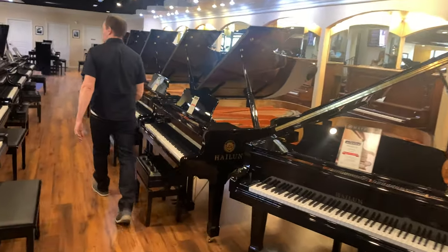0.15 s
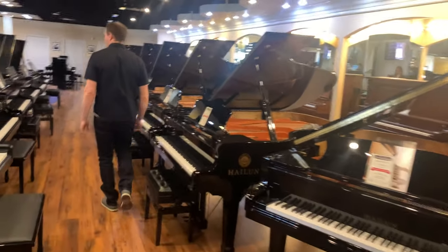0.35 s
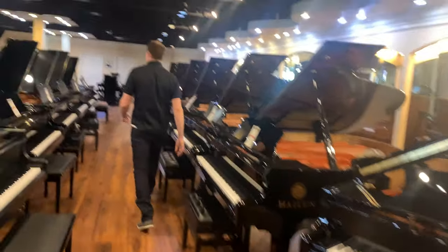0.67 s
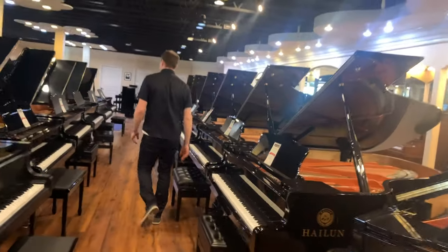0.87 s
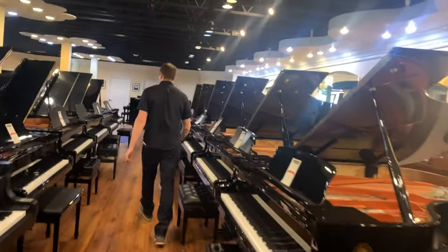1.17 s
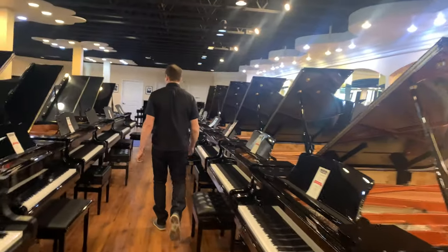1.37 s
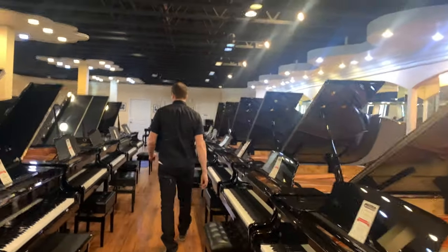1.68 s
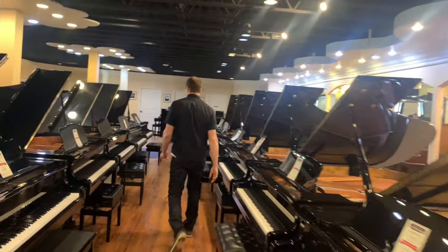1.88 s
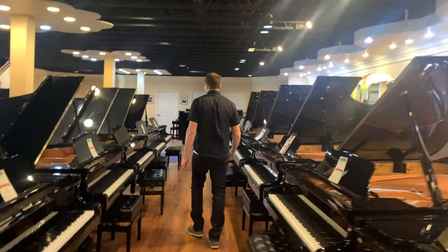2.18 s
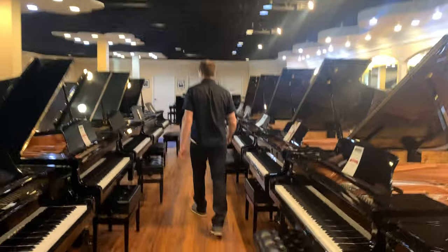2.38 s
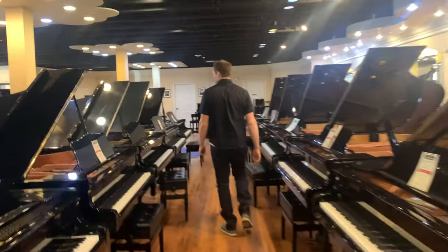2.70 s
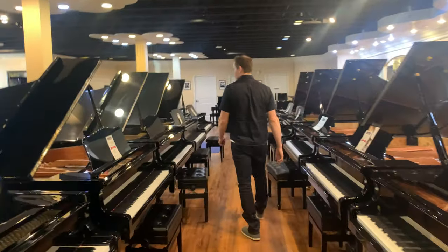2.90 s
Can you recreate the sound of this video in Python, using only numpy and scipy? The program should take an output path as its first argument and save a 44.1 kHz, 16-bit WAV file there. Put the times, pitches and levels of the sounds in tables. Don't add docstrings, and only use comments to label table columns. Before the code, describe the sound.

Footsteps on wooden boards, hollow heel knocks at a walking pace, echoing over faint ventilation hum

```python
import sys
import numpy as np
from scipy import signal
from scipy.fft import rfft, irfft
from scipy.io import wavfile
from scipy.ndimage import uniform_filter1d

SR = 44100
rng = np.random.default_rng(int(sys.argv[2]) if len(sys.argv) > 2 else 0)


def to_linear_factor(level_db):
    exponent = np.asarray(level_db, float) / 20
    return 10 ** exponent


def generate_wav(sig):
    pcm = np.round(np.clip(np.atleast_2d(sig).T, -1, 1) * 32767).astype(np.int16)
    wavfile.write(sys.argv[1], SR, pcm)


N = 134505
SIZE = 32768

# start_s, level_db, board_pitch_hz, board_width_hz, tick_re_knock_db
HEEL_KNOCKS = [(0.1178, -37.5, 390, 231, -40), (0.645, -47, 400, 300, -32), (.6632, -14, 706, 1000, -4.5),
               (1.0910, -21.5, 463, 242, -3.5), (1.1204, -13, 556, 500, -18),
               (1.5878, -11.5, 366.5, 122, -31.5), (1.6625, -21, 400, 180, -3),
               (1.6772, -26.5, 530, 400, -13), (1.7725, -36.5, 525, 400, 2.5),
               (2.0952, -11.5, 338, 162, -31), (2.1678, -19.5, 377, 224, -18),
               (2.1785, -26, 635, 500, -29.5), (2.415, -42.5, 493, 400, -11),
               (2.601, -11.5, 416, 179, -27.5), (2.6057, -10.5, 422, 110, -35),
               (2.667, -20.5, 410, 176.6, -27.5), (3.014, -59, 900, 600, 6.5)]
# start_s, level_db, pitch_hz, push_s, ring_t60_s
JOIST_THUDS = [
    (.005, -49.5, 61, 0.019, 0.18),
    (.185, -39, 112.8, 0.01, 0.36),
    (1.011, -36, 71.9, 0.025, 0.74),
    (1.125, -35.5, 74.6, 0.012, 0.64),
    (1.758, -61.5, 63.7, 0.013, 0.24),
    (2.29, -46.5, 58, 0.013, 0.29),
    (2.37, -53.5, 81.3, 0.022, 0.44),
    (2.549, -41.5, 875, 0.0024, 0.027),
    (.215, -42, 146.5, 0.014, .2),
]
# start_s, length_s, level_db, centre_hz, airy_top_re_centre_db
SOLE_SCUFFS = [(.001, 0.024, -67.5, 3360, -33), (.125, 0.054, -56, 417, -58), (.145, 0.16, -73, 1850, -9),
               (.2, 0.083, -61, 362, -50), (.428, 0.048, -59, 2300, 0.5), (.432, 0.036, -67, 580, -43),
               (.662, 0.043, -54.5, 4860, 1), (0.991, 0.013, -60, 2500, -5.5),
               (1.003, 0.05, -47, 241, -33.5), (1.090, .008, -55.5, 5000, -24),
               (1.663, 0.0056, -71.5, 4040, 5), (1.3, 0.025, -69.5, 2960, -10.5),
               (1.85, 0.033, -59.5, 833, -21.5), (1.768, 0.08, -70.5, 2500, -14.5),
               (2.241, 0.11, -80, 2920, 2), (2.39, 0.18, -68, 1150, -31), (2.477, 0.044, -69, 3740, 4),
               (2.735, 0.042, -74, 3430, 8.5)]
# delay_s, level_db
EARLY_ECHOES = [(0.0103, -10.5), (0.0183, -7.5), (.040, -13)]
# pitch_hz, t60_s
HALL_DECAY = [(125, 0.76), (250, 0.63), (500, 0.56), (1000, 0.56), (2000, 0.59), (4000, 0.36), (8000, 0.41)]
# pitch_hz, level_db
HALL_TONE = [(125, 1.5), (250, 5), (500, 1), (1000, 2), (2000, -1.5), (4000, 6), (8000, -3)]
# pitch_hz, gain_db
HUM_TONE = [(22, -7), (55, 3.5), (130, -2), (300, -4), (800, -18), (2000, -22.5), (5000, -43),
            (14000, -29.5)]
# pitch_hz, gain_db
TREBLE_COLOUR = [(5500, 0), (7700, -5.5), (8100, -1.5), (10600, -7), (11600, -24), (12500, -7), (15000, -9.5),
                 (16000, -40.5)]
# pitch_hz, left_lead_rad
PORT_PHASE = [(600, 0.16), (2200, 1.2), (4000, 1.37), (7000, 1.7), (14000, 2)]
# time_s, left_minus_right_db
WALKER_PAN = [(.1, -14), (1.1, -6), (1.5, -12.5), (2.1, -7.5), (3, -11.5)]


def shape(table, hz):
    table_hz, value = np.array(table).T
    return np.interp(np.log(hz + 1), np.log(table_hz), value)


def reso(f, hz, width_hz):
    return 1j * f * width_hz / (hz ** 2 - f ** 2 + 1j * f * width_hz)


def peak(spec, db):
    return spec * to_linear_factor(db) / np.abs(irfft(spec)).max()


def causal(power):
    cepstrum = irfft(np.log(power + 1e-20) / 2)
    fold = np.r_[1, 2 * np.ones(SIZE // 2 - 1), np.zeros(SIZE // 2)]
    return np.exp(rfft(cepstrum * fold))


def walk(rate):
    k = int(SR / rate)
    steps = np.repeat(rng.standard_normal(N // k + 1), k)
    drift = uniform_filter1d(uniform_filter1d(steps, k), k)[:N]
    return drift / drift.std()


def hum():
    level_db, swell_db, alike_hz = -57, 3, 2500
    f = np.fft.rfftfreq(N, 1 / SR)
    mid, side = rfft(rng.standard_normal((2, N))) * to_linear_factor(shape(HUM_TONE, f))
    ears = mid + side * np.clip(0.3 + f / alike_hz, 0, 0.8) * np.array([[1], [-1]])
    out = 0
    for hz in 22 * 2.0 ** np.arange(10):
        band = np.clip(1 - np.abs(np.log2((f + 1) / hz)), 0, 1)
        depth_db = swell_db * min(1, 150 / hz + 0.069)
        out = out + irfft(ears * band, N) * to_linear_factor(depth_db * walk(5.3))
    return out * to_linear_factor(level_db) / out.std()


def hall(f):
    rise_s, alike = 0.0027, 0.45
    t = np.arange(SIZE // 2) / SR
    a, b = rng.standard_normal((2, SIZE // 2))
    ears = rfft([a, alike * a + np.sqrt(1 - alike ** 2) * b], SIZE)
    tail, last = 0, len(HALL_DECAY) - 1
    for k, (hz, t60) in enumerate(HALL_DECAY):
        octaves = np.clip(np.log2((f + 1) / hz), 0 if k == 0 else -9, 0 if k == last else 9)
        band = np.clip(1 - np.abs(octaves), 0, 1)
        fade = to_linear_factor(-60 * t / t60) / np.sqrt(t60 * SR / np.log(1e6))
        tail = tail + irfft(ears * band)[:, :SIZE // 2] * fade
    return rfft(tail * (1 - np.exp(-t / rise_s)), SIZE) * to_linear_factor(shape(HALL_TONE, f))


def add(out, at, near, far, pan_db, tail, f):
    pan_top_hz, tail_pan_share = 526, 0.3
    lean = 1 / (1 + (f / pan_top_hz) ** 4) / (1 + (130 / (f + 1)) ** 2)
    pan = np.array([[pan_db], [-pan_db]]) / 2 * lean
    skew = 1 + 0.13 * rng.standard_normal((len(EARLY_ECHOES), 2, 1))
    early = 0
    for (delay_s, db), stretch in zip(EARLY_ECHOES, skew):
        early = early + to_linear_factor(db) * np.exp(-2j * np.pi * f * delay_s * stretch)
    direct = near * (1 + early / (1 + 1j * f / 1500)) * to_linear_factor(pan)
    sound = irfft(direct + far * to_linear_factor(tail_pan_share * pan) * tail)
    i = int(at * SR)
    out[:, i:i + SIZE] += sound[:, :max(0, min(SIZE, N - i))]


def scuff(f, length, db, hz, top_db):
    grit_db, top_hz, wet_db = 2.3, 8200, -0.5
    t = np.arange(SIZE) / SR
    grit = rng.standard_normal(SIZE) * to_linear_factor(grit_db * rng.exponential(size=SIZE))
    patches = np.repeat(rng.standard_normal(SIZE // 256), 256)
    patchy = to_linear_factor(2.1 * uniform_filter1d(patches, size=200))
    attack = np.clip(t / (0.076 * length), 0, 1)
    release = np.clip((1.254 * length - t) / (0.83 * length), 0, 1)
    body = reso(f, hz, 0.66 * hz) * reso(f, hz, 3 * hz)
    brush = rfft(grit * patchy * attack * release) * to_linear_factor(db) / np.sqrt(np.mean(np.abs(body) ** 2))
    top = to_linear_factor(top_db) * reso(f, top_hz, 5000) ** 2
    return brush * (body + top), brush * (body + 0.3 * top) * to_linear_factor(wet_db)


def thud(f, db, hz, push, t60):
    t = np.arange(SIZE) / SR
    modes = np.sin(2 * np.pi * hz * t) + 0.3 * np.sin(2 * np.pi * hz * 1.3 * t)
    near = peak(rfft(modes * to_linear_factor(-60 * t / t60) * (1 - np.exp(-t / push))), db)
    return near, near * to_linear_factor(-16)


def knock(f, db, hz, width_hz, tick_db):
    tick_hz, tick_width_hz, tick_top_db = 2300, 1600, -21
    cavity_hz, cavity_width_hz, cavity_db = 350, 420, -7
    skirt_db, skirt_hz, bass_cut_hz = -17, 1000, 125
    soft_ratio = 2.83
    travel_s, travel_hz = 0.00271, 400
    tail_widen = 1.46
    tail_tick_share, tail_tick_db = 0.57, -6.5
    shadow_hz, hall_db = 2685, -5

    tick = np.abs(reso(f, tick_hz, tick_width_hz)) ** 6
    tick = tick + to_linear_factor(2 * tick_top_db) * np.abs(reso(f, 4900, 13000)) ** 2
    skirt = to_linear_factor(2 * skirt_db) / (1 + (f / skirt_hz) ** 6)
    cavity = np.abs(to_linear_factor(cavity_db) * reso(f, cavity_hz, cavity_width_hz) ** 2) ** 2
    bass_cut = (f ** 2 / (f ** 2 + bass_cut_hz ** 2)) ** 2
    travel = np.exp(-2j * np.pi * travel_s * travel_hz * np.log(1 + f / 60))

    def contact(width, snap_db):
        board = (np.abs(reso(f, hz, width)) ** 4 + (skirt + cavity) * width / 200) * bass_cut
        board = board / (1 + (f / (soft_ratio * (hz + width))) ** 6)
        power = board / board.sum() + to_linear_factor(2 * snap_db) * tick / tick.sum()
        return peak(causal(power) * travel, db)

    near = contact(width_hz, tick_db)
    far = contact(width_hz * tail_widen, tail_tick_share * tick_db + tail_tick_db)
    shadow = causal(1 / (1 + (f / shadow_hz) ** 6) + to_linear_factor(-29))
    return near * shadow, far * to_linear_factor(hall_db)


def scene():
    f = np.fft.rfftfreq(SIZE, 1 / SR)
    out = hum()
    halls = [hall(f) for _ in range(9)]
    for k, (at, *row) in enumerate(SOLE_SCUFFS):
        add(out, at, *scuff(f, *row), -1.5, halls[k % 9], f)
    for k, (at, *row) in enumerate(JOIST_THUDS):
        add(out, at, *thud(f, *row), -2, halls[k % 9], f)
    for k, (at, *row) in enumerate(HEEL_KNOCKS):
        pan_db = np.interp(at, *np.array(WALKER_PAN).T)
        add(out, at + 0.0001, *knock(f, *row), pan_db, halls[k % 9], f)
    return out


def band_limit(x):
    return signal.sosfilt(signal.butter(12, 16480, fs=SR, output="sos"), x)


def record(dry):
    f = np.fft.rfftfreq(N, 1 / SR)
    turn = np.exp(0.5j * shape(PORT_PHASE, f) * np.array([[1], [-1]]))
    mix = irfft(rfft(dry) * to_linear_factor(shape(TREBLE_COLOUR, f)) * turn, N)
    return band_limit(mix)


dry = scene()
out = record(dry)
generate_wav(out)
```